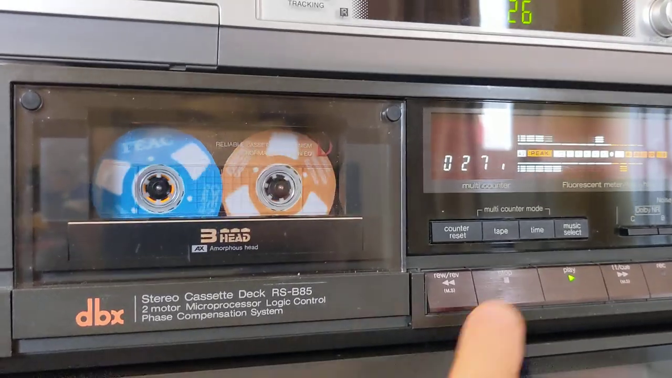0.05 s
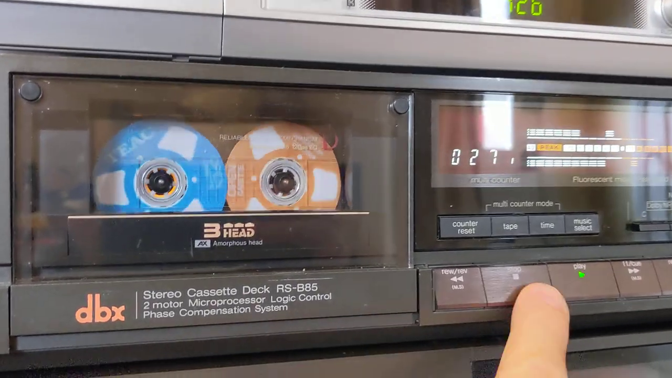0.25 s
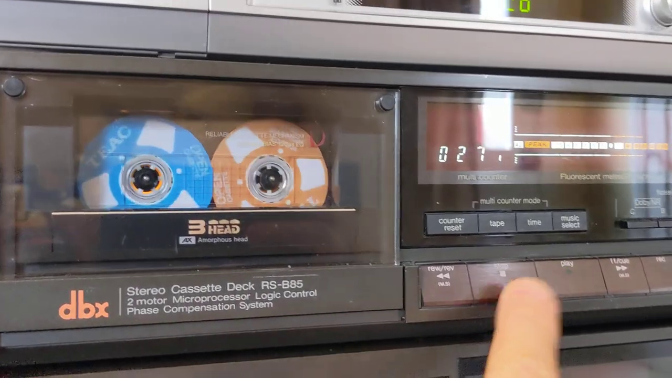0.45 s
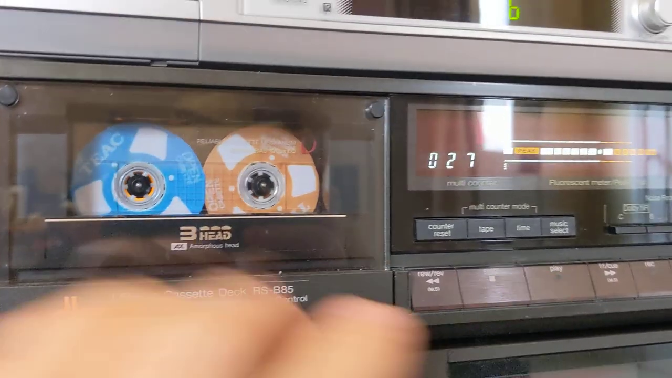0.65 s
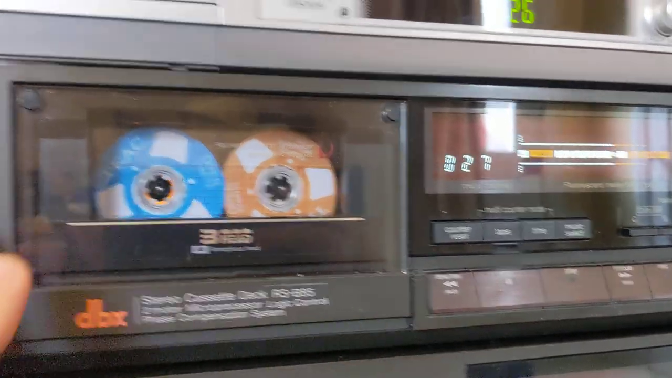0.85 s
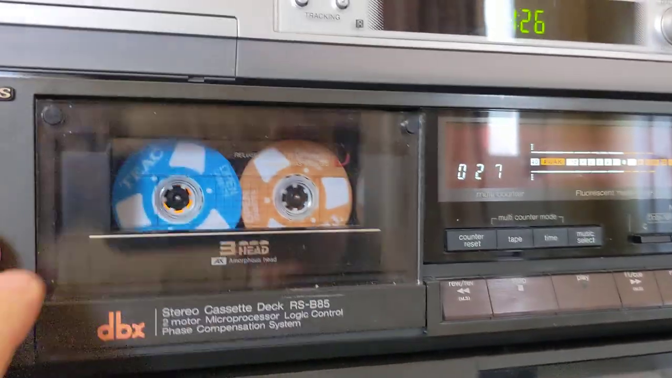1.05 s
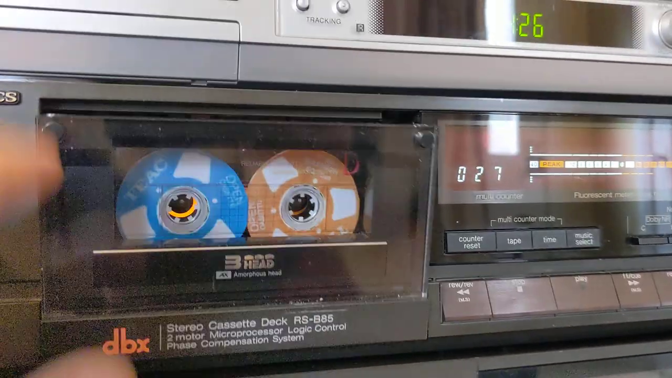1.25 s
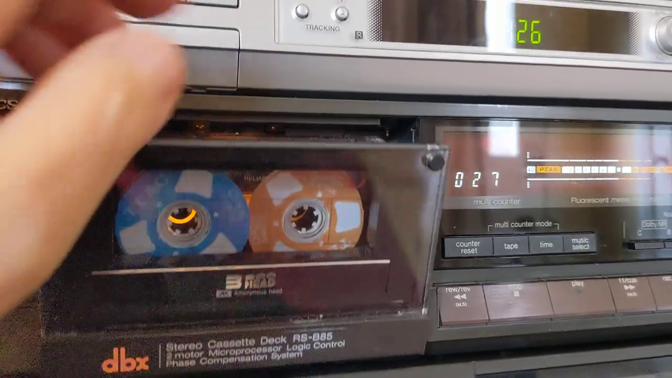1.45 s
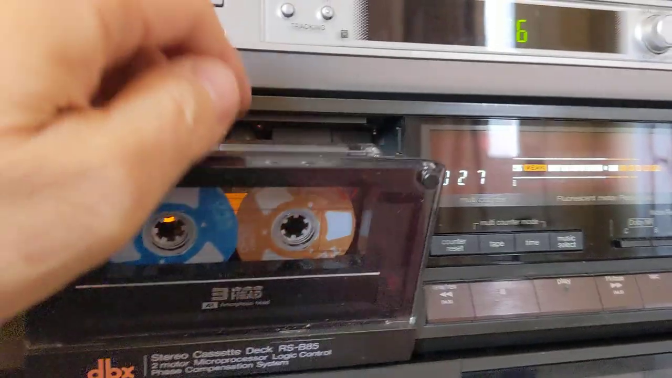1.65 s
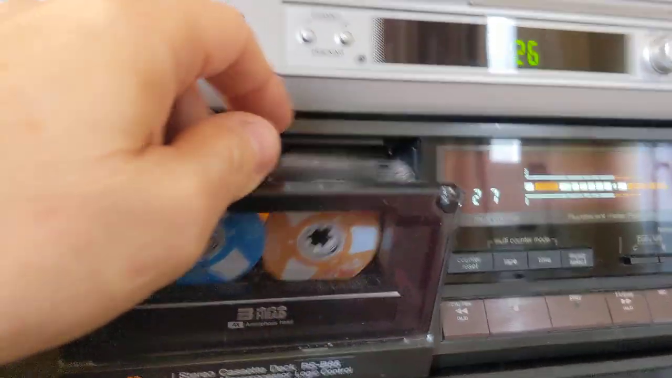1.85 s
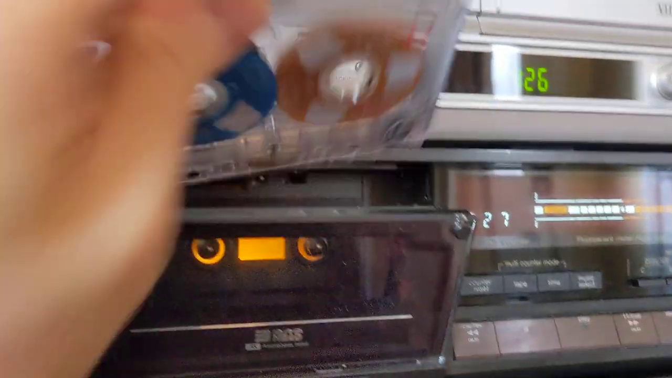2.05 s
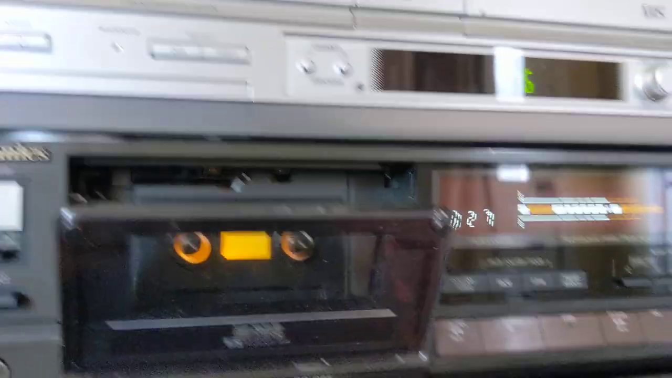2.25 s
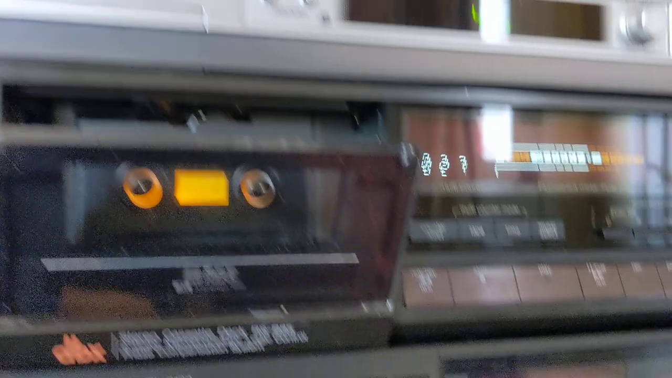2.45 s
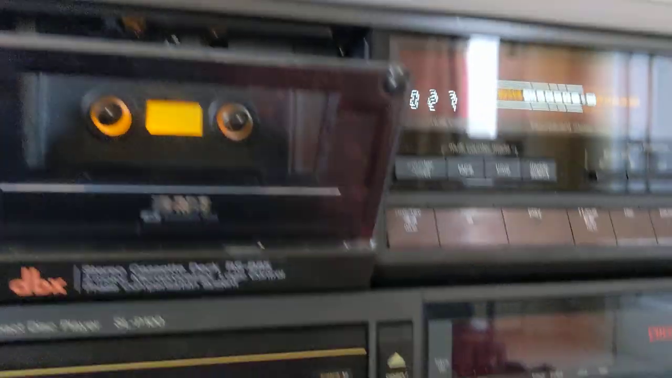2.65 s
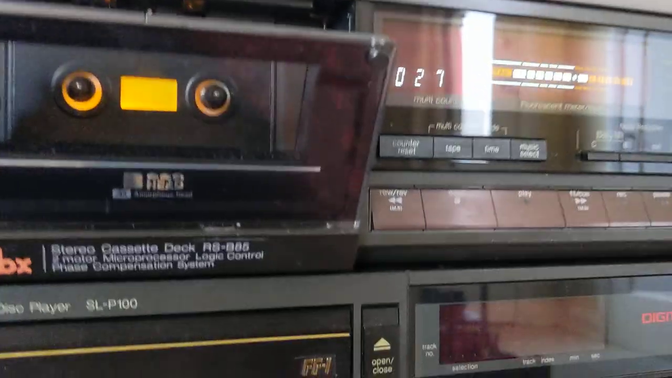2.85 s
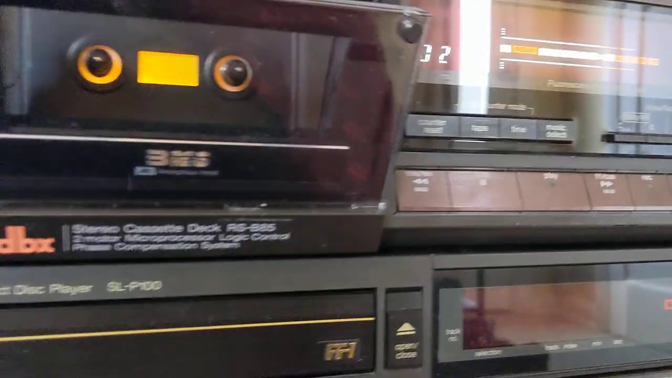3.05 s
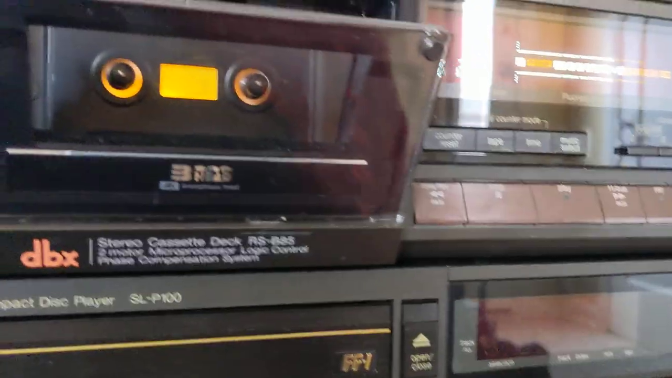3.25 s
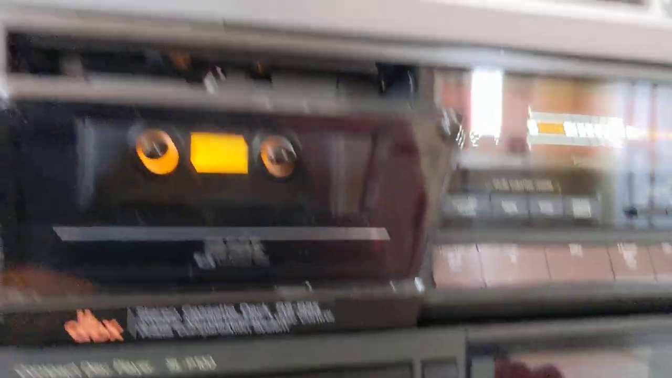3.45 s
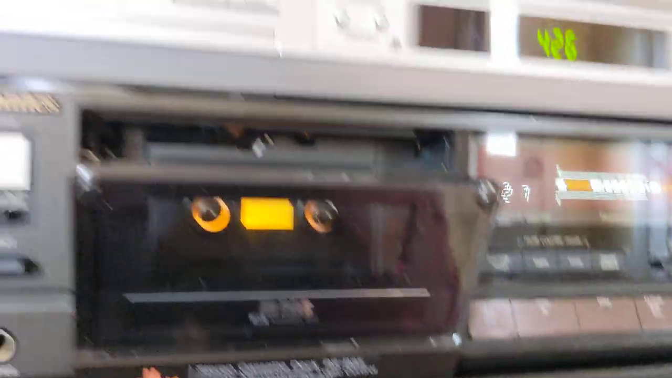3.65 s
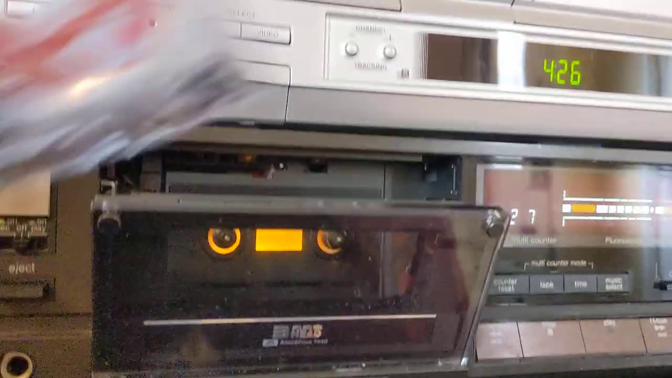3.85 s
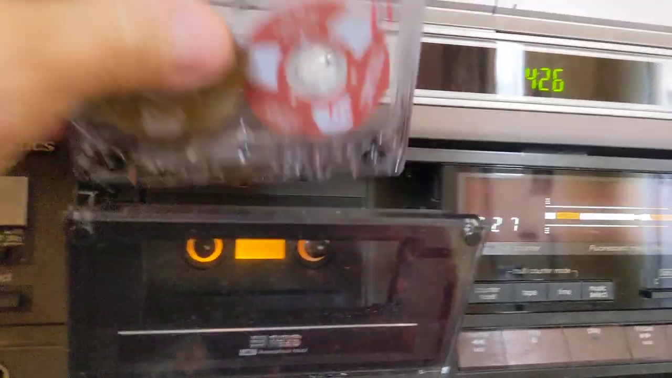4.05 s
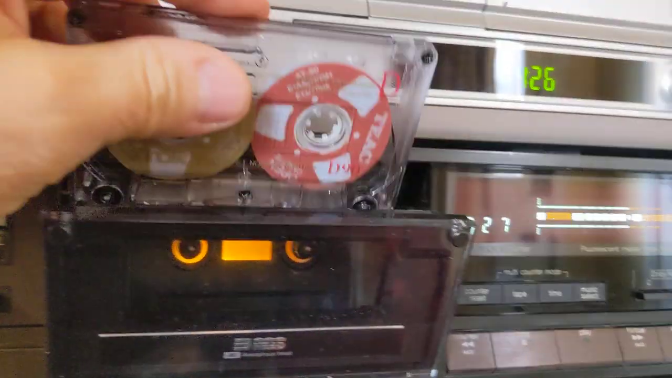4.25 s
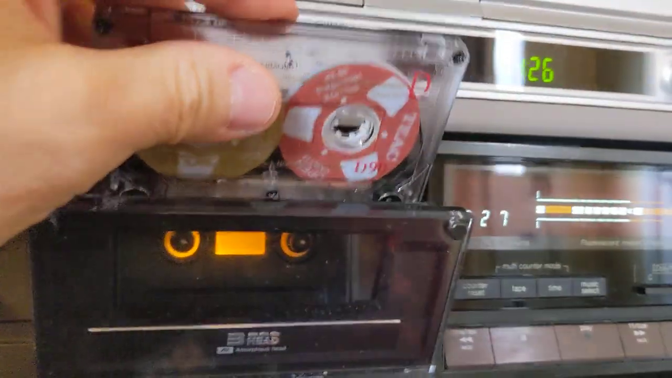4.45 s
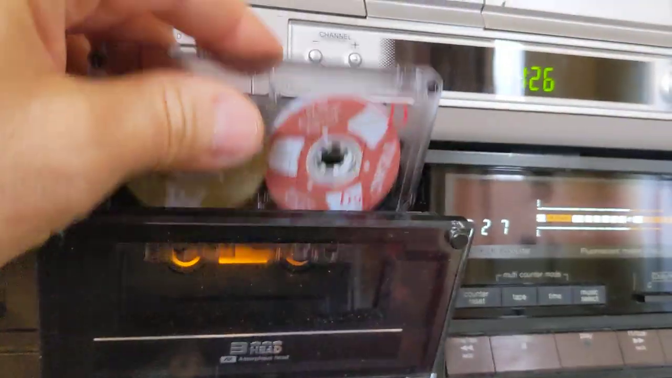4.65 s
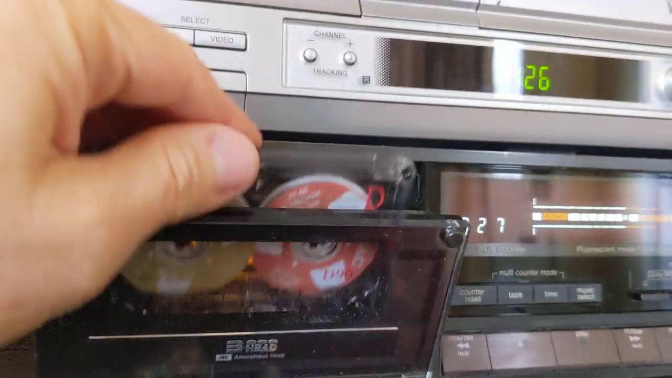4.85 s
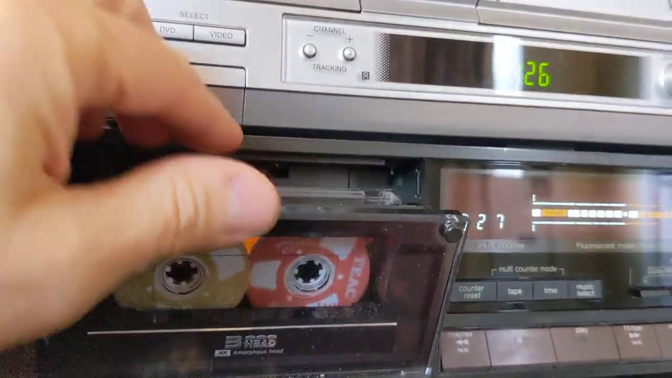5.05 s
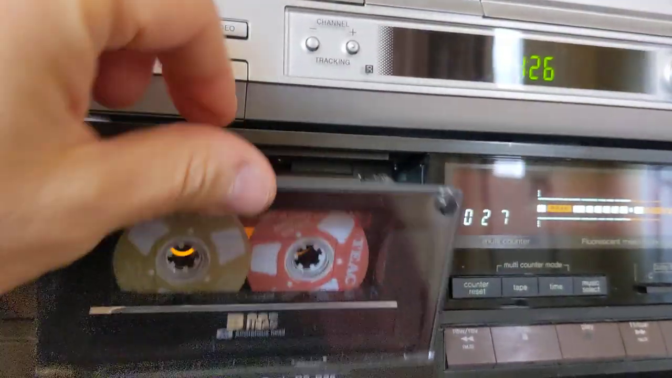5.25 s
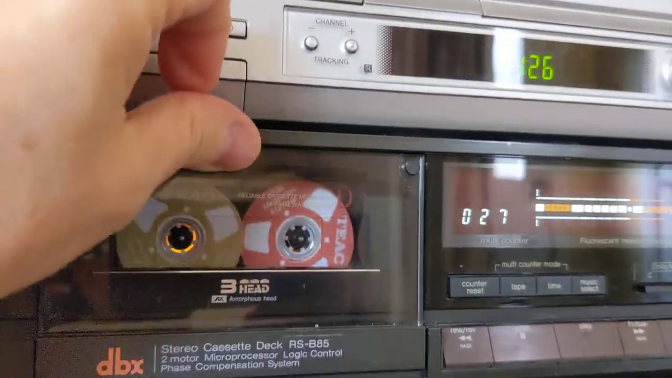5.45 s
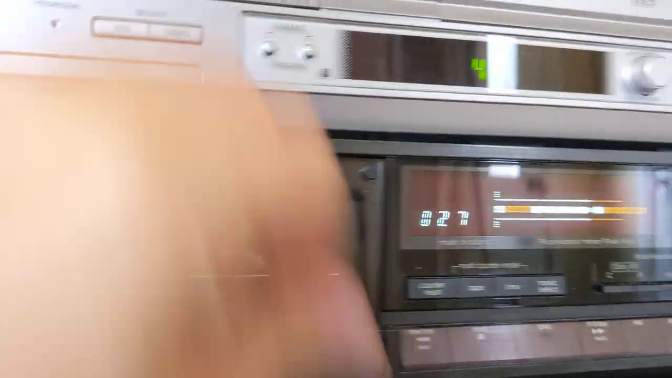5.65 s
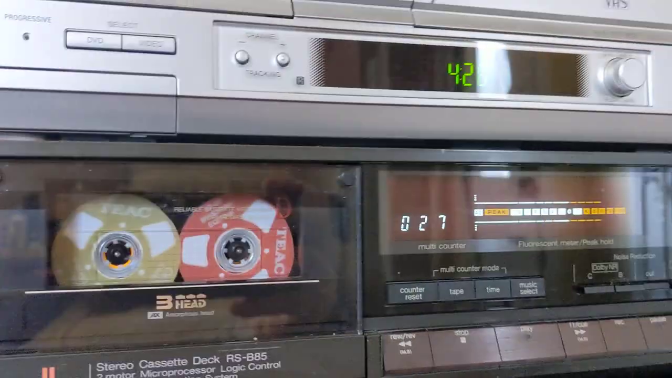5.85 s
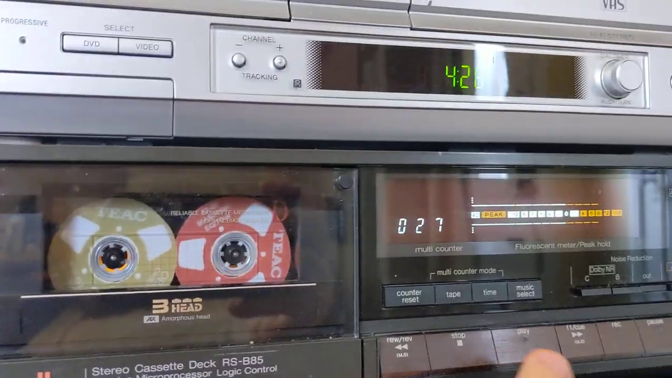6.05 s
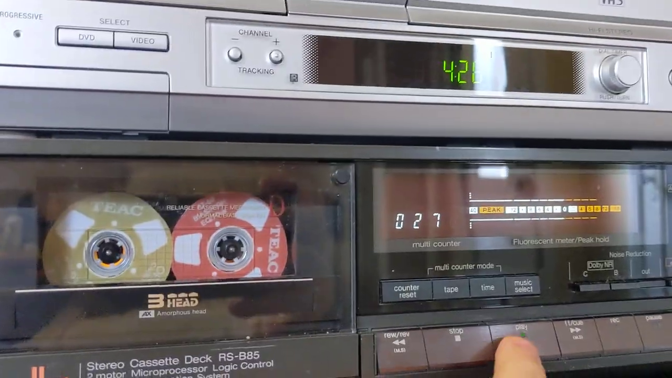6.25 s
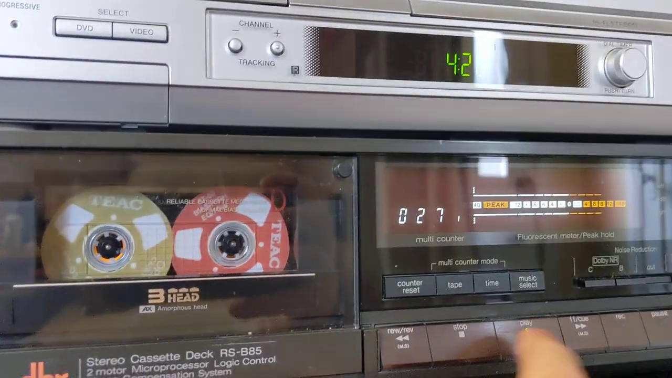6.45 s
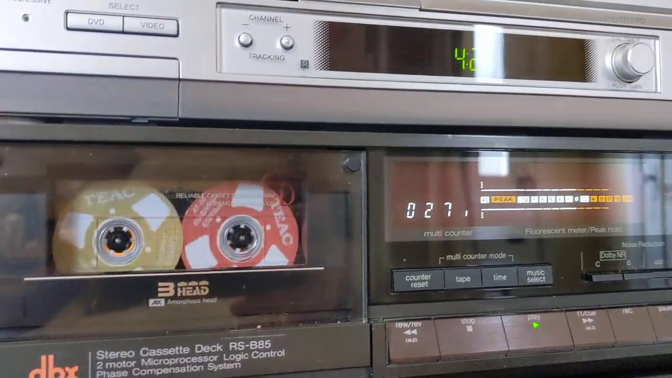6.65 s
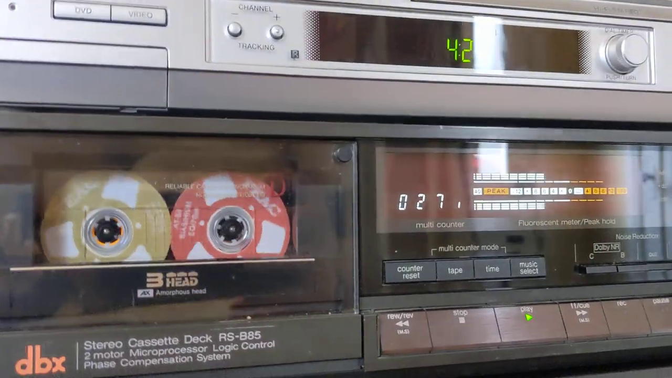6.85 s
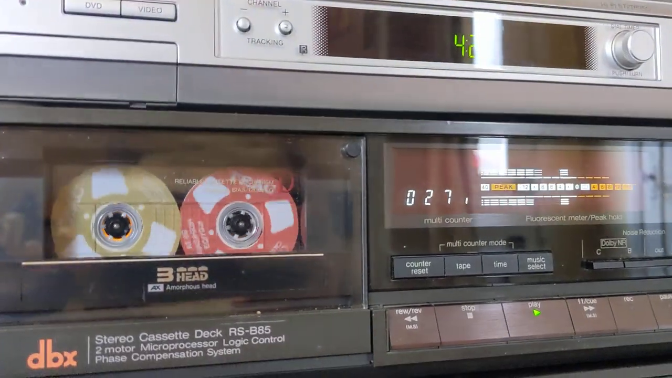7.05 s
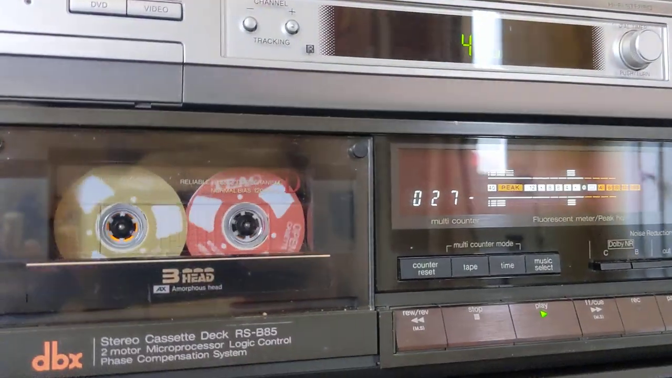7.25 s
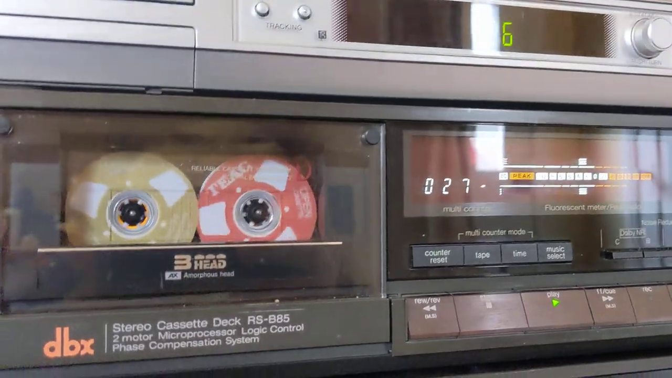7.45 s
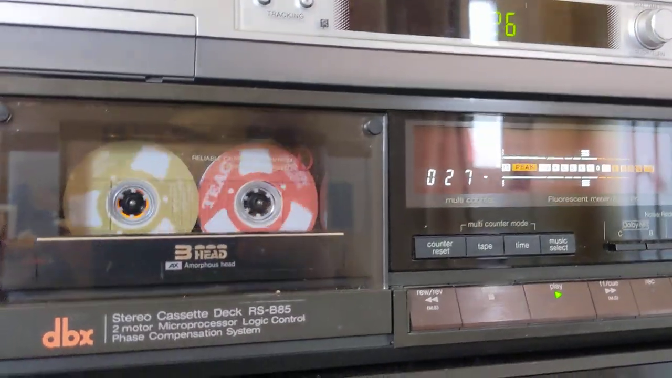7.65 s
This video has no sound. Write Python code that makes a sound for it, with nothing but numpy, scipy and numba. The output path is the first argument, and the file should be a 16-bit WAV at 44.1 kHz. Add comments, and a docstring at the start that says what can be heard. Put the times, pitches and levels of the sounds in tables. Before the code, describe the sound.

Close on a cassette deck in a quiet room, a key clicks and the mechanism clunks with a short motor whirr. The door unlatches and drops open, a plastic cassette scrapes out and is laid down sharply. Another rattles and slides in, snaps into place, and the door shuts. A second key click brings a whirr and heavy clunk, then faint tape drive hiss. Fingers bump the handheld microphone.

```python
"""A tape deck in a quiet room, close to a hand-held phone: a key stops the tape, the door drops open, one cassette
is pulled out and laid down, another slides in, the door is shut and play is pressed. Each blow is a snap and a
short rattle that rings the deck's chassis or its plastic; gritty noise makes motor whirrs, slides and rustle,
filtered noise the tape drive and the house. The phone's far microphone hears the deck later and duller; fingers
bump the phone as decaying low cycles."""
import sys
import numpy as np
from scipy import signal
from scipy.fft import rfft, irfft
from scipy.io import wavfile
from scipy.ndimage import uniform_filter1d
from numba import njit

SR = 44100
rng = np.random.default_rng(int(sys.argv[2]) if len(sys.argv) > 2 else 0)


def to_wav(sig):
    """Store sig (one row per channel, or 1-D mono) as 16-bit WAV at the path in sys.argv[1].

    Samples outside -1..1 are clipped; the rate is SR.
    """
    pcm = np.clip(np.atleast_2d(sig), -1, 1) * 32767
    pcm = np.round(pcm).astype(np.int16)
    wavfile.write(sys.argv[1], SR, pcm.T)  # frames by channels


N = 340011
T = np.arange(N) / SR
BIN_HZ = np.arange(N // 2 + 1) * SR / N


def undb(db):
    """Amplitude of a level in dB."""
    return 10 ** (np.asarray(db) / 20)


def unit(x):
    """Scale to an RMS of one."""
    return x / np.sqrt(np.mean(x ** 2))


def span(s, x):
    """The samples that sound x covers when it starts at s."""
    return slice(int(s * SR), int(s * SR) + len(x))


def on_hz(table):
    """A table of (f/Hz, value) read at every bin."""
    hz, value = np.transpose(table)
    return np.interp(np.log(BIN_HZ + 1), np.log(hz), value)


def band(x, lo_hz, hi_hz):
    """Keep one frequency range."""
    edges_hz = [lo_hz, min(hi_hz, .45 * SR)]
    return signal.sosfilt(signal.butter(2, edges_hz, "bandpass", fs=SR, output="sos"), x)


def noise_band(lo_hz, hi_hz):
    """White noise kept to one range, at an RMS of one."""
    return unit(band(rng.standard_normal(N), lo_hz, hi_hz))


def walk(rate):
    """Random levels around zero, held 1 / rate s and slewed twice; spread near 1."""
    k = int(SR / rate)
    held = np.repeat(rng.standard_normal(N // k + 1), k)
    return 1.5 * uniform_filter1d(uniform_filter1d(held, k), k)[:N]


def grit(spread_db, size):
    """Noise made of small contacts of uneven but bounded strength, each size samples long."""
    strength = np.minimum(rng.exponential(size=N // size + 1), 4.5)
    contact_db = spread_db * np.repeat(strength, size)[:N]
    return unit(rng.standard_normal(N) * undb(contact_db))


@njit
def resonate(force, pole):
    """One mode whose pole may move from sample to sample."""
    out, z = np.empty(len(force)), 0j
    for i in range(len(force)):
        z = z * pole[i] + force[i]
        out[i] = z.imag
    return out


def mode(force, hz, t60):
    """A force rings one damped mode; hz may be a number or a track."""
    pole = np.exp(2j * np.pi * hz / SR - np.log(1000) / (t60 * SR))
    return resonate(force + 1e-18, pole * np.ones(len(force)))


def room():
    """Distant house noise: octave bands swell a little; the low middle is much the same on both sides."""
    # spectrum of the house noise before the overall level: f/Hz, level/dB per Hz
    spectrum = [(35, -2), (60, -6.5), (168, -3), (262, -15.5), (469, -14.5), (666, -5.5), (715, -14),
                (1170, -20), (1660, -21.5), (3850, -34), (16000, -43)]
    # balance of the noise: f/Hz, left minus right level/dB
    balance = [(70, -10), (200, 8), (700, -0.5), (2400, 7.5), (15000, 6.5)]
    # likeness of the sides: f/Hz, share of power common to both [0 to 1]
    alike = [(70, 0), (290, 1), (640, 0.55), (1400, 0)]
    level_db, swell_db = -50.5, 1.5

    common, left, right = rfft(rng.standard_normal((3, N)))
    share, pan = np.clip(on_hz(alike), 0, 1), on_hz(balance) / 2
    sides = np.sqrt(share) * common + np.sqrt(1 - share) * np.array([left, right])
    both = undb(on_hz(spectrum) + np.array([pan, -pan])) * sides
    octave = np.log2(BIN_HZ / 60 + 1e-9)
    out = np.zeros((2, N))
    for k in range(9):
        overlap = np.clip(1 - abs(octave - k), 0, 1)
        out += undb(swell_db * walk(5.6)) * irfft(both * overlap, N)
    return unit(out) * undb(level_db)


def wavering_hiss(table):
    """Noise bands, each wandering slightly in level."""
    out = np.zeros(N)
    for hz, width_hz, db in table:
        out += undb(db + walk(2.88)) * noise_band(hz - width_hz / 2, hz + width_hz / 2)
    return out


def drive():
    """The tape drive whispers while it runs; apart from it, a thin high whine from the deck's display swells
    now and then, and narrow hiss stays throughout."""
    # running tape drive: f/Hz, width/Hz, level/dB before it wavers
    transport = [(3870, 7400, -71.5), (9930, 450, -71.5), (13500, 3800, -64.5)]
    # narrow hiss that stays: f/Hz, width/Hz, level/dB before it wavers
    hiss_bands = [(12330, 570, -74), (13900, 300, -69)]
    # middles of the whine's swells: t/s
    swell_times = (1.65, 2.77, 5.92, 6.9, 7.32, 7.57)
    stop_s, play_s = .4, 6.7
    whine_hz, whine_db, swell_s = 4470, -68, .11  # level before the swells

    running = uniform_filter1d(((T < stop_s) | (T > play_s)).astype(float), size=5000)
    swell = sum(np.exp(-((T - s) / swell_s) ** 2) for s in swell_times) + .3
    whine = undb(whine_db) * swell * noise_band(whine_hz - 15, whine_hz + 15)
    return wavering_hiss(transport) * running + whine + wavering_hiss(hiss_bands)


def bumps(swell_s, apart, roll_db, roll_s):
    """A bump is a few low cycles, apart radians out of step at the ports; the grip rumbles and rolls on after it."""
    # fingers bump the phone: t/s, peak level/dB before panning, f/Hz
    finger_bumps = [(0.711, -32.5, 149), (2.139, -32.5, 72.5), (2.28, -23.5, 69), (2.371, -21, 98),
                    (2.55, -23.5, 73), (3.547, -39, 91), (5.826, -32.5, 106), (6.677, -22.5, 81.8),
                    (7.141, -36, 78.5), (7.27, -32, 84)]
    # grip rumble: t/s, level/dB before its side's share and wander
    grip_levels = [(2, -70), (2.4, -41.5), (2.9, -66), (6.6, -64.5), (7.1, -51.5), (7.71, -55)]
    pan_db = -2.5  # left minus right: the fingers lie nearer the right port

    out, t = np.zeros((2, N)), T[:SR // 4]
    held = undb(np.interp(T, *np.transpose(grip_levels)))
    for s, db, hz in finger_bumps:
        swell = (t / swell_s * np.exp(1 - t / swell_s)) ** 2
        swing = swell * np.sin(2 * np.pi * hz * t + np.array([[apart], [0]]))
        out[:, span(s, t)] += undb(db + np.array([[pan_db], [-pan_db]]) / 2) * swing
        held[span(s, t)] += undb(db + roll_db) * t / roll_s * np.exp(1 - t / roll_s)
    grip = [undb(side_db + 2.9 * walk(13)) * noise_band(31, 125.5) for side_db in (-4, 4)]
    return out + held * np.array(grip)


def carried(s):
    """Boom and bass dB of whatever carries a blow at time s."""
    # low end by carrier: from t/s, boom level/dB re blow, bass level/dB re blow
    # chassis, carriage dropping, door falling, cassette in the door, in the hand, against the palm, laid down,
    # back in the door, meeting the guides, sliding down them, seated, door shut, door let go, chassis
    carrier = [(0, -11, -6), (.54, -0.5, 2.5), (.9, -12, -9.5), (1.8, -3.5, -11.5), (2.25, -23, -17.5),
               (2.45, 5, 6), (2.8, -20, -13.5), (4.15, -6, -7.5), (4.53, 5.5, -10), (4.6, -5, -11),
               (5.0, -8, -6.5), (5.4, -6, -4), (5.599, -1.5, -6), (6.0, -13, -8)]
    since, boom_db, bass_db = np.transpose(carrier)
    now = np.clip(np.searchsorted(since, s) - 1, 0, None)
    return boom_db[now], bass_db[now]


def rustle():
    """Forces of patchy small ticks and scuffs while hands and parts move."""
    # fingers shift a cassette or the mechanism settles, small contacts at random: from t/s, to t/s
    busy_times = [(.38, .59), (1.12, 1.34), (2.04, 2.26), (2.47, 2.56), (2.9, 3.36), (3.8, 4.05),
                  (4.39, 4.58), (4.83, 5.15), (5.46, 5.66), (6.38, 6.6)]
    # force levels: low end before the carrier's share/dB, mid and treble before muffling/dB
    range_levels = (-51, -53.5, -65)

    busy = sum(1. * ((T > s0) & (T < s1)) for s0, s1 in busy_times)
    patchy = uniform_filter1d(busy, size=1100) * undb(3.0 * walk(60))
    low_db, mid_db, treble_db = range_levels
    boom_db, bass_db = carried(T)
    muffle_db = 20 * (bass_db > 0)  # a carrier that adds bass, like the palm, dulls the rest
    parts_db = [low_db + boom_db, low_db + bass_db, mid_db - muffle_db, treble_db - muffle_db]
    return patchy * grit(3.6, size=90) * undb(parts_db)


def jingles():
    """A loose metal reel part in the cassette: short shakes keep one thin mode ringing."""
    # shakes of the reel part: t/s, level/dB of the force
    shakes = [(2.121, -45), (2.191, -51), (2.33, -59), (3.81, -64.5), (3.9085, -66), (4.02, -67),
              (4.11, -63.5), (4.52, -58), (4.56, -57), (4.7044, -62), (5.063, -44.5), (5.1024, -52)]
    shake, t = np.zeros(N), T[:SR // 8]
    for s, db in shakes:
        shake[span(s, t)] += undb(db) * np.exp(-t / 0.021)
    return mode(shake * grit(2.0, size=30), hz=7450, t60=.05)


def whirrs_and_slides(rough_db):
    """Motor whirrs and plastic slides alike: patchy grit rings a pitch that bends, over a broad roughness of ticks."""
    # the drive's motor whirrs briefly after each key (first and last rows); in between, plastic slides on plastic:
    # t/s, tone level/dB, f/Hz before it bends, length/s
    rubs = [(0.438, -48, 1474, 0.19), (1.904, -40, 1770, 0.092), (2.919, -43.5, 1605, 0.16),
            (3.792, -43.5, 1555, 0.088), (4.843, -40.5, 1960, 0.035), (4.915, -42.5, 1720, 0.031),
            (4.975, -45.5, 1860, 0.18), (6.484, -44, 1550, 0.14)]
    out = np.zeros(N)
    rub = grit(2.0, size=40) * undb(2.2 * walk(60))
    ticks, bend = grit(3.6, size=130), 1 + .015 * walk(25)
    for s, db, hz, length in rubs:
        at = span(s, T[:int(length * SR)])
        piece = rub[at] * np.sqrt(np.hanning(len(rub[at])))
        silence = 0 * piece  # room for the ring to die away
        push = np.append(piece, silence)
        rough = np.append(abs(piece) * ticks[at], silence)
        whole = span(s, push)
        tone = unit(mode(push, hz * bend[whole], t60=.045))
        out[whole] += undb(db) * (tone + undb(rough_db) * unit(band(rough, 880, 9300)))
    return out


def blows(table, rise_s, boom_peak_s, snap_t60, rattle_db, rattle_t60, treble_share):
    """A sharp snap and a gritty rattle, longer when harder; the boom swells later, the treble's rattle dies sooner."""
    rattle_growth = 0.14  # the rattle lengthens by this share of each added dB
    medium_db = -32.5  # a medium blow, whose rattle lasts rattle_t60
    force, t = np.zeros((4, N)), T[:SR // 3]
    boom = undb(rattle_db) * (t / boom_peak_s * np.exp(1 - t / boom_peak_s)) ** 2
    snap = 1000. ** (-t / snap_t60)
    for s, db, treble_db in table:
        range_share = np.array([[1], [1], [treble_share]])  # bass, mid, treble
        t60 = rattle_t60 * undb(rattle_growth * (db - medium_db)) * range_share
        fade = (snap + undb(rattle_db) * 1000. ** (-t / t60)) * (1 - np.exp(-t / rise_s))
        range_db = db + np.array([*carried(s), 0, treble_db])
        force[:, span(s, t)] += undb(range_db)[:, None] * np.vstack([boom, fade])
    return force * grit(1.42, size=12)


def ring(force, modes, ring_db, crack_db, spot_db, drift):
    """Boom, bass, mid and treble forces crack broadly and ring the modes in their range.
    Where a blow lands and how the part is held keep changing: colour and pitch wander."""
    edges_hz = (130, 400, 1300, 5500, 16500)
    boom, bass, mid, treble = (undb(db) * band(f, lo, hi)
                               for f, db, lo, hi in zip(force, crack_db, edges_hz, edges_hz[1:]))
    out = boom - bass + mid - treble  # neighbouring ranges join without a gap
    for hz, db, t60 in modes:
        in_range = np.searchsorted(edges_hz, hz) - 1
        push = force[in_range] * undb(spot_db * np.tanh(walk(18)))
        out = out + undb(db + ring_db) * mode(push, hz * (1 + drift * walk(5)), t60)
    return out


def plastic():
    """Door, latch and cassette shells knock, rustle and ring in short modes."""
    # knocks: t/s, blow level/dB, treble level/dB re blow
    knock_table = [(0.9592, -31.5, -30), (0.9744, -28, -7), (1.1225, -16, -4), (1.1907, -23.5, -13),
                   (1.2393, -23, -13), (1.273, -28.5, 1), (1.2915, -40, 18), (1.301, -23.5, 8.5),
                   (1.3099, -17.5, -1), (1.917, -27.5, -20), (1.9568, -23.5, -4.5), (2.0918, -13.5, -4.5),
                   (2.1191, -18, -7), (2.2046, -24.5, -16), (2.2922, -28, -23), (2.3035, -18.5, -10.5),
                   (2.388, -26, -15), (2.9293, -9.5, -5.5), (3.1466, -25, -1), (3.181, -32.5, -23),
                   (3.227, -48, -22), (3.2496, -30.5, -26), (3.275, -34.5, -28), (3.342, -33.5, -30),
                   (3.3944, -20.5, -11), (3.404, -14, -13), (3.495, -29, -9.5), (3.606, -36, -9),
                   (3.908, -31, -6), (3.924, -34.5, -9), (3.9712, -26, -2.5), (4.001, -40, -15),
                   (4.061, -33, -2.5), (4.096, -34.5, -12), (4.1154, -34.5, -25), (4.2042, -17.5, -14),
                   (4.2148, -19.5, 3), (4.3188, -26, -17), (4.336, -28.5, -19), (4.404, -32.5, -26),
                   (4.4265, -33, -23), (4.449, -33, -15), (4.4922, -19.5, -9), (4.5074, -37, -22),
                   (4.5431, -25.5, -13), (4.616, -21, -15), (4.6723, -17.5, -30), (4.6922, -14, -4),
                   (4.8024, -23, -14.5), (5.0445, -26, 3), (5.052, -14, -1), (5.0619, -15, -7),
                   (5.467, -25.5, -42), (5.4767, -28, 0), (5.4873, -18, -2.5), (5.5104, -23, -17),
                   (5.5177, -13, 0.5), (5.6182, -29, 6), (5.633, -23, -10)]
    # modes of door and shells: f/Hz before it wanders, level/dB before ring_db, t60/s
    shell_modes = [(203.2, -2, 0.22), (319, 3, 0.065), (612, 5.5, 0.052), (783, 2, 0.071),
                   (1222, 18.5, 0.022), (1634, -0.5, 0.06), (1840, 0.5, 0.066), (2680, 19.5, 0.0029),
                   (4590, -8.5, 0.085)]
    knocks = blows(knock_table, rise_s=0.0025, boom_peak_s=0.02, snap_t60=0.019,
                   rattle_db=-12.5, rattle_t60=0.09, treble_share=0.72)
    return ring(knocks + rustle(), shell_modes, ring_db=-32.0, crack_db=(7.9, 18.3, 8.43, 5.87),
                spot_db=5.5, drift=.025)


def keys():
    """A key clicks and the solenoid answers a moment later."""
    # stop, then play: t/s
    press_times = (.3621, 6.3699)
    key_db, key_treble_db = -29, -4
    solenoid_lag_s, solenoid_db, solenoid_treble_db = 0.01765, -14, 5
    clicks = [(s, key_db, key_treble_db) for s in press_times]
    return clicks + [(s + solenoid_lag_s, solenoid_db, solenoid_treble_db) for s in press_times]


def chassis():
    """Keys, solenoid and the travelling head carriage strike the deck's chassis and ring its modes."""
    # the head carriage travels and seats after each key: t/s, blow level/dB, treble level/dB re blow
    carriage_blows = [(0.458, -32, -14), (0.5154, -35.5, 11.5), (0.551, -36.5, 17.5), (0.564, -23.5, -2.5),
                      (6.4763, -31, -17.5), (6.4976, -31, 9.5), (6.5454, -10.5, -14)]
    # modes of the chassis: f/Hz before it wanders, level/dB before ring_db, t60/s
    deck_modes = [(196.9, 5, 0.35), (330, 2.5, 0.073), (531, -10.5, 0.18), (795, 1.5, 0.13),
                  (2000, 3, 0.028), (2355, 5.5, 0.058), (4540, 12, 0.016)]
    strikes = blows(keys() + carriage_blows, rise_s=0.0038, boom_peak_s=0.034, snap_t60=0.038,
                    rattle_db=-15, rattle_t60=0.095, treble_share=0.093)
    return ring(strikes, deck_modes, ring_db=-29.5, crack_db=(14.5, 12.1, 8.1, 0.95),
                spot_db=0.0, drift=.012)


def port(parts):
    """The microphone port favours a high range: that band is added on top."""
    return parts + undb(1.5) * band(parts, 11090, 16300)


def phone(near, t60, wet_db, damp_hz):
    """The near microphone faces the deck; the far one is shadowed and late. Walls answer each differently, duller."""
    # shadow at the far microphone: f/Hz, level/dB
    shadow = [(300, -5.5), (1100, -6), (1600, -13), (2100, -14), (3000, -26), (4200, -26), (11000, -42),
              (16000, -35)]
    # lateness at the far microphone: f/Hz, phase lag/radians
    far_lag = [(1, 0.58), (860, 0.46), (1380, 3.46), (2670, 11.45), (16000, 51)]

    t = T[:SR // 2]
    echo = rng.standard_normal((2, len(t))) * 1000. ** (-t / t60)
    echo = band(echo / np.sqrt(np.sum(echo ** 2) / 2), 47, damp_hz)
    wet = signal.fftconvolve(near[None], echo, axes=1)[:, :N]
    both = near + undb(np.array([[wet_db], [wet_db + 10.0]])) * wet  # more of the walls at the far side
    late = np.exp(-1j * np.interp(BIN_HZ, *np.transpose(far_lag)))
    far = irfft(rfft(both[1]) * undb(on_hz(shadow)) * late, N)
    return np.array([both[0], far])


def scene():
    """The deck heard at both microphones, with the hand on the phone and the house behind."""
    parts = chassis() + plastic() + whirrs_and_slides(rough_db=-6.0)
    deck = port(parts) + jingles() + drive()
    heard = phone(deck, t60=0.26, wet_db=-12.0, damp_hz=10000)
    handling = bumps(swell_s=0.011, apart=1.53, roll_db=-16.5, roll_s=0.02)
    return heard + handling + room()


def record(dry):
    """The phone drops the deepest bass and cuts the top."""
    low_cut = signal.sosfilt(signal.butter(4, 35, "highpass", fs=SR, output="sos"), dry)
    return signal.sosfilt(signal.ellip(10, .2, 80, 15900, fs=SR, output="sos"), low_cut)


dry = scene()
out = record(dry)
to_wav(out)
```